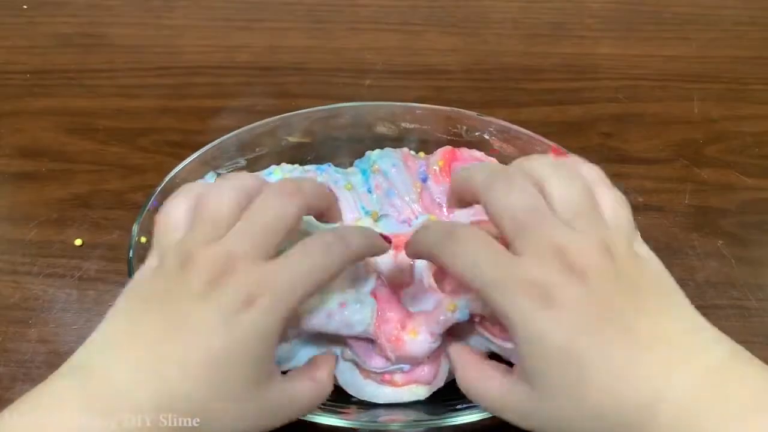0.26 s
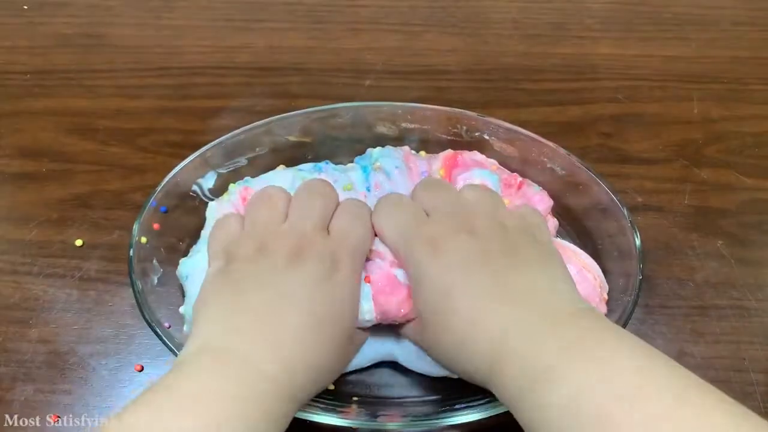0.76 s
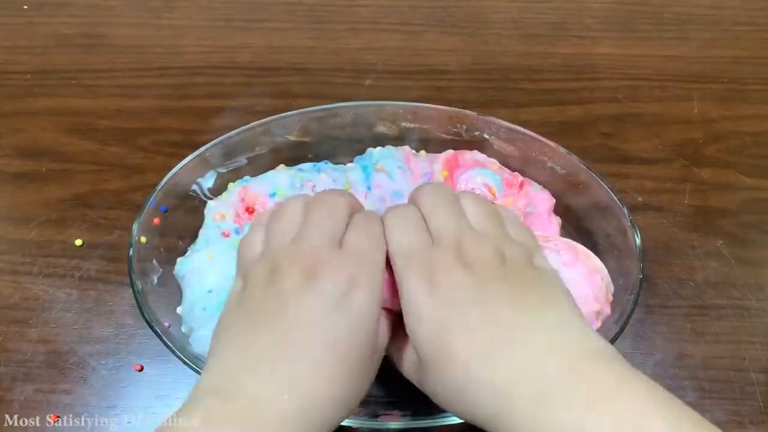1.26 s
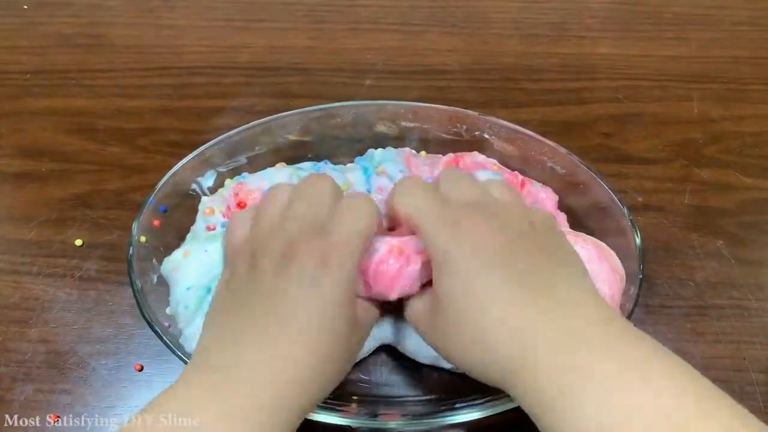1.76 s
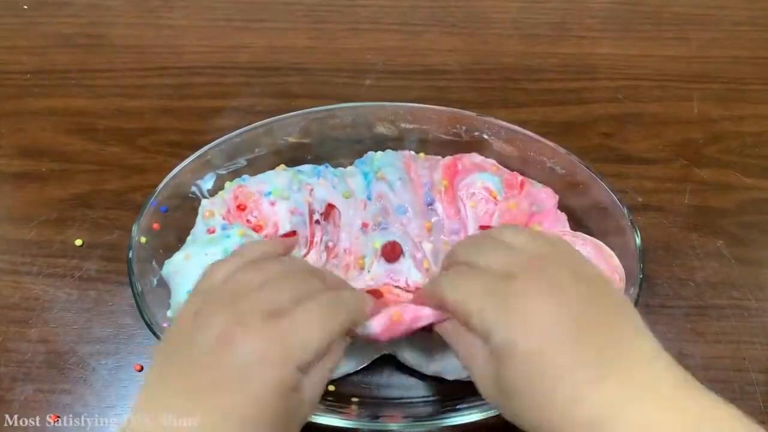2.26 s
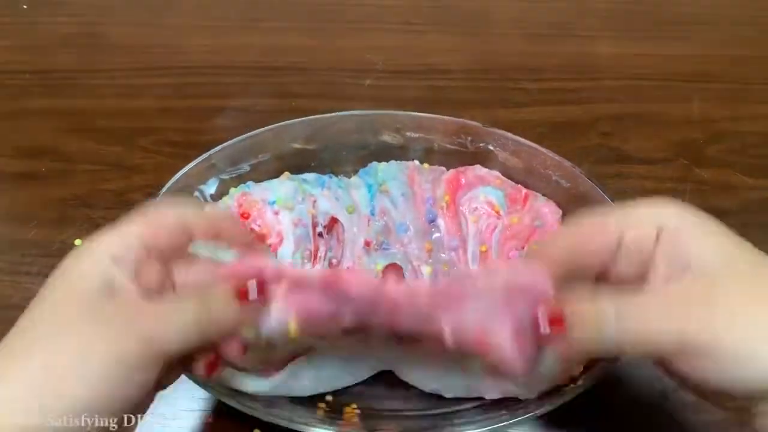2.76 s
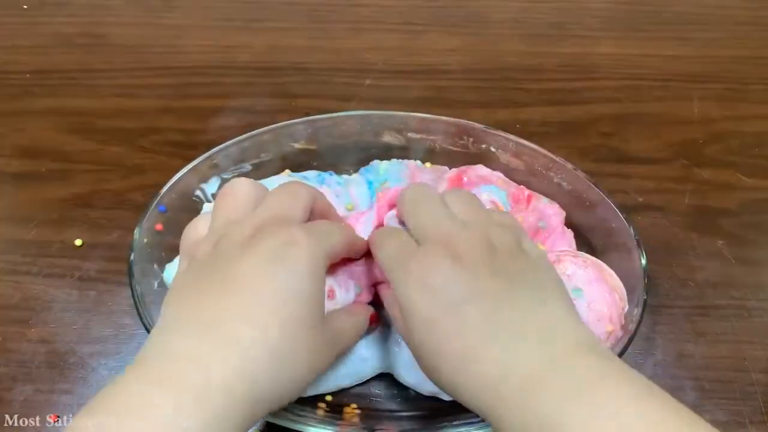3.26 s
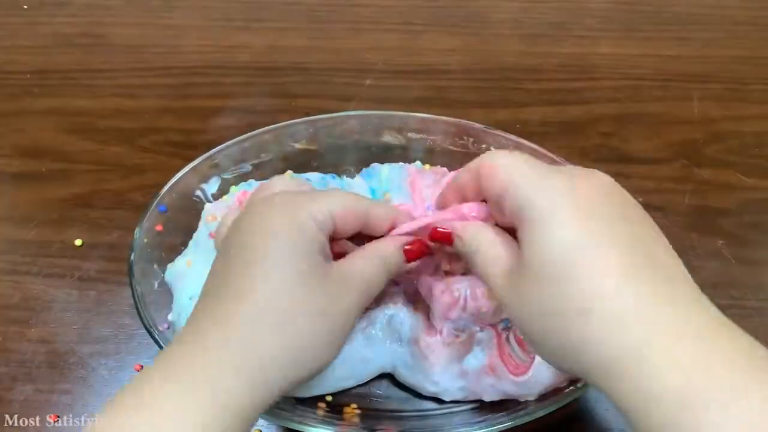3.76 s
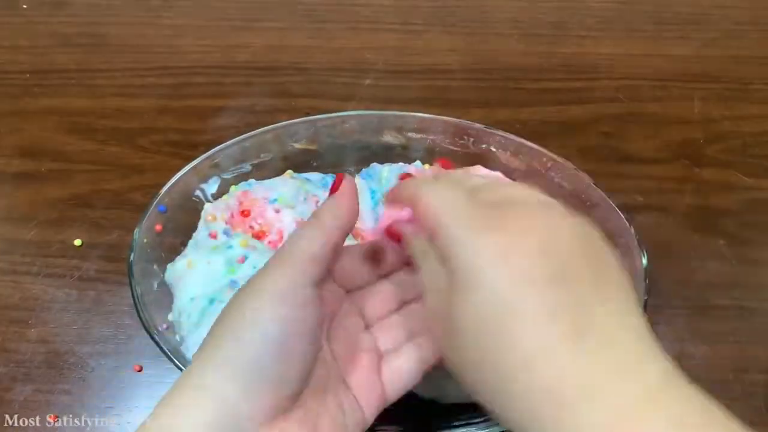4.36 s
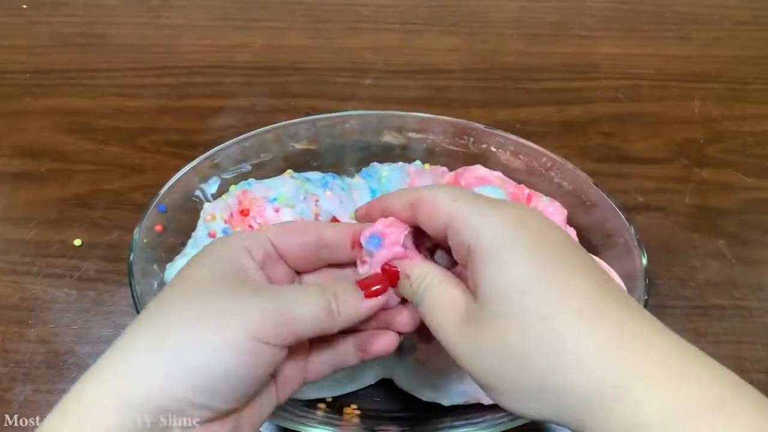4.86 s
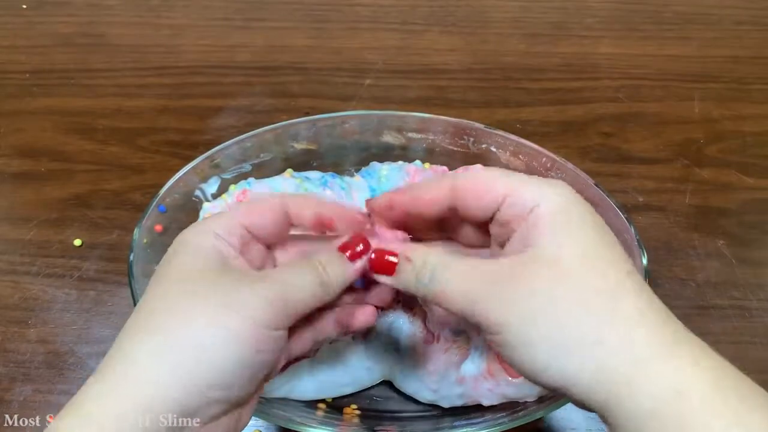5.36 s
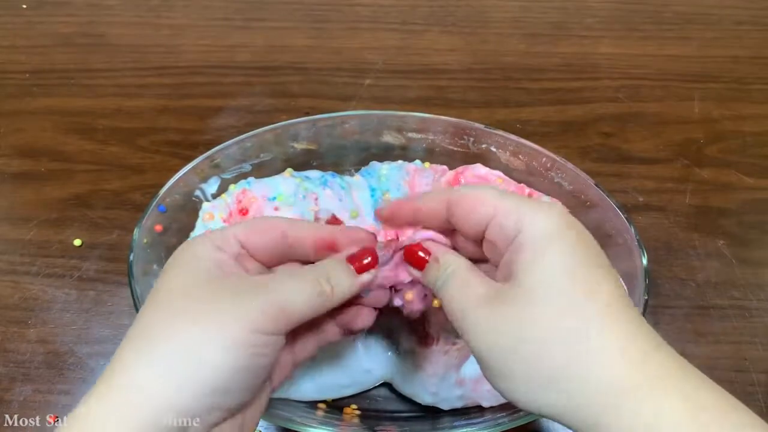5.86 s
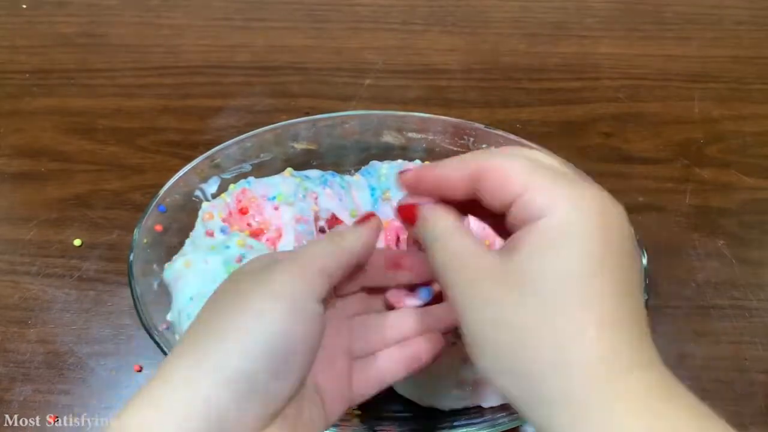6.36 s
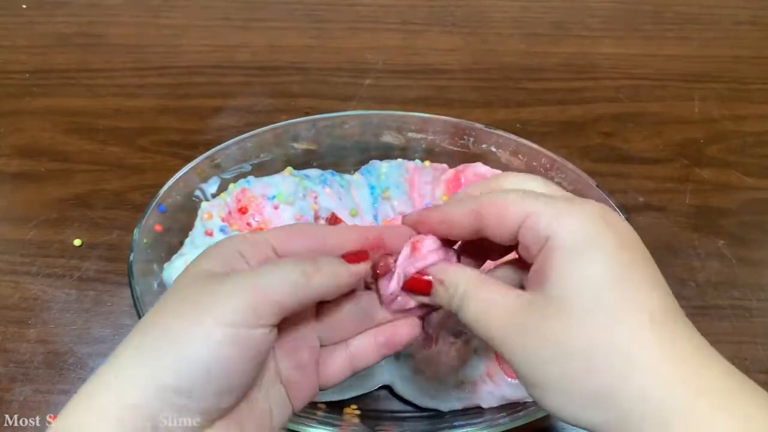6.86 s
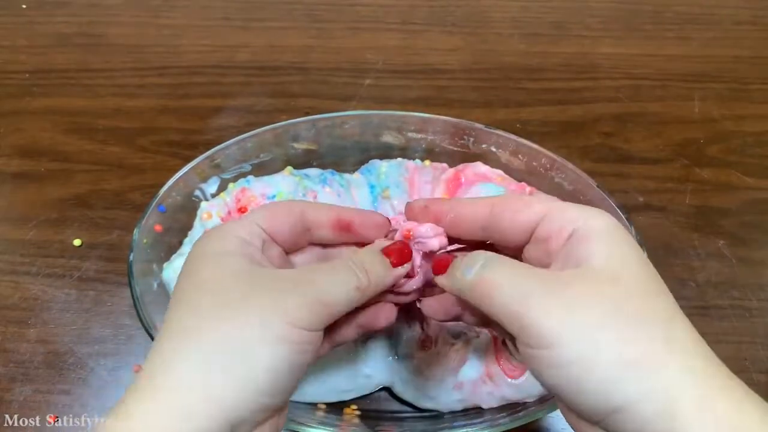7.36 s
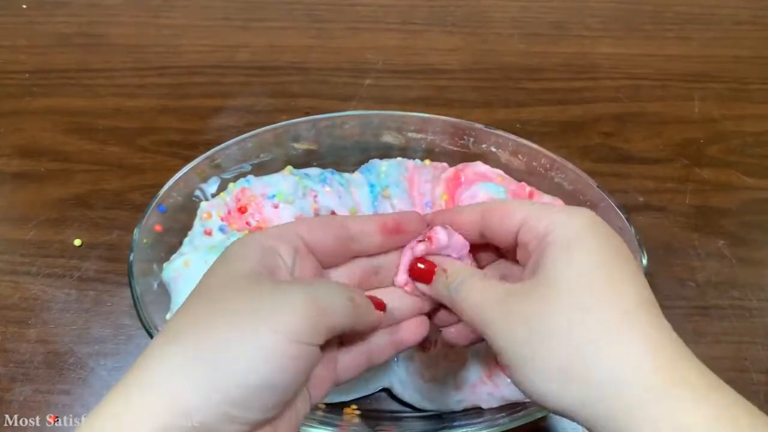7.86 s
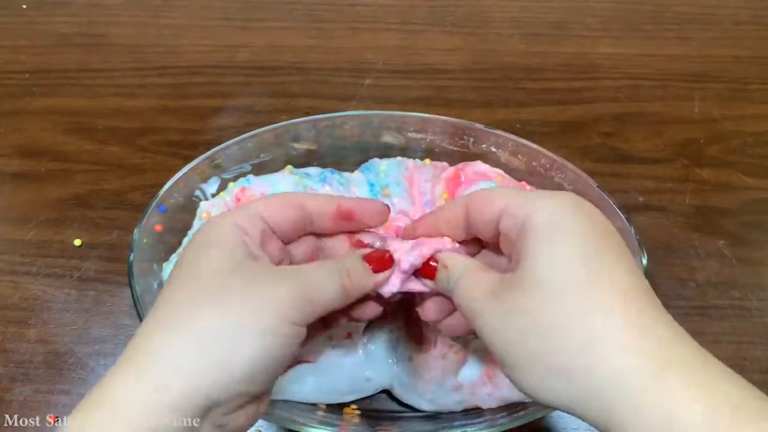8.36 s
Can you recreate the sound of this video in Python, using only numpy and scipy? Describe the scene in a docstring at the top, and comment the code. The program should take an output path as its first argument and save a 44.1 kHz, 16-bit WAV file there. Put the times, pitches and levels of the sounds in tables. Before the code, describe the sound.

Hands squeeze wet beaded slime in a glass bowl, three loud squelches burst into diving plops, then quieter squishes and scattered sticky snaps follow.

```python
"""Two hands work wet slime in a glass bowl on a table, close to a stereo microphone in a small room.
The bowl still rings from a touch at the start; in the first seconds come three hard squeezes,
each a swelling fizz of tiny bubbles, then a run of plops, big pockets whose notes dive in pitch.
Lighter squeezes follow to the end, noise bursts over ringing grains that shed a few tiny snaps.
Sticky crackle, soft handling noise, room air and a low hum are shaped from random noise."""
import sys
import numpy as np
from scipy import signal
from scipy.fft import rfft, irfft, next_fast_len
from scipy.io import wavfile

SR = 44100
rng = np.random.default_rng(int(sys.argv[2]) if len(sys.argv) > 2 else 0)


def wav_record(signal):
    """Record a signal, one row per channel, as 16-bit PCM in the file named by sys.argv[1]."""
    frames = np.transpose(np.atleast_2d(signal))
    bounded = np.clip(frames, -1, 1)
    # unit amplitude maps onto the largest positive 16-bit level
    quanta = np.round(bounded * 32767).astype(np.int16)
    wavfile.write(sys.argv[1], SR, quanta)


N = 379701
TIME = np.arange(N) / SR   # s

# Squishes, air forced through the slime. Each row: fullest moment in seconds, fade in seconds,
# fizz level in dB, gurgle level in dB, gurgle pitch in Hz; the levels are ahead of the trims.
SQUEEZES = [(0.189, 0.39, -59.5, -62.5, 2400), (.515, 0.12, -45, -48, 2470),
            (0.569, 0.02, -42.5, -33, 2660), (0.969, 0.066, -48, -58, 4980),
            (1.065, 0.064, -52, -52.5, 2890), (1.17, 0.046, -47, -59, 3460),
            (1.388, 0.062, -32, -32.5, 2870), (1.744, 0.021, -61, -59.5, 3000),
            (1.871, 0.033, -55, -50.5, 4760), (2.052, 0.098, -55.5, -60, 3550),
            (2.13, 0.084, -37, -37, 2810), (2.709, .05, -56.5, -60, 2450),
            (2.912, 0.018, -56.5, -64.5, 4440), (3.123, 0.032, -54, -59.5, 2880),
            (3.229, 0.043, -52, -56, 4200), (3.463, 0.022, -56.5, -67.5, 1930),
            (3.614, 0.022, -61, -70, 3960), (3.822, 0.051, -49, -50.5, 3200),
            (4.155, 0.026, -63, -61.5, 2730), (4.584, 0.023, -58.5, -57.5, 5360),
            (4.775, 0.03, -51, -54, 4000), (4.835, 0.023, -49, -46.5, 5280),
            (4.942, 0.022, -49.5, -57.5, 5300), (5.078, 0.024, -65, -60, 3830),
            (5.524, 0.043, -48.5, -48.5, 3474), (5.735, 0.02, -51, -54, 3400),
            (5.985, .05, -52.5, -67, 4400), (6.07, 0.019, -52.5, -57, 3360),
            (6.131, 0.044, -59.5, -62, 4520), (6.237, 0.013, -53.5, -56.5, 4700),
            (6.606, 0.012, -47, -52, 4670), (6.781, 0.05, -56, -64.5, 3320),
            (6.994, 0.011, -53.5, -61, 4200), (7.179, .016, -46, -60, 2060),
            (7.568, .012, -49.5, -55.5, 3000), (7.993, 0.02, -50, -56, 3590),
            (8.106, 0.014, -61, -63, 2980), (8.56, 0.026, -45, -45, 3170)]
# Stretches of kneading with a steady crackle. Each row: start in seconds, end in seconds,
# film level in dB, cavity level in dB; the levels are ahead of the trims.
KNEADING = [(0.219, 0.316, -70, -64), (0.721, .88, -79.5, -68), (0.981, 1.288, -53, -53.5),
            (1.559, 1.701, -74.5, -68.5), (1.761, 2.018, -60, -58.5), (5.95, 6.12, -57, -85),
            (8.279, 8.356, -73, -68.5)]

# a move of the hands changes by EDGE_DB over its swell time and again over its fade time
EDGE_DB, SQUEEZE_SWELL_S = -12.5, 0.026


def from_db(db):
    """Decibels to gain."""
    return 10 ** (np.asarray(db) / 20)


def rms_one(x):
    """Scale to unit rms."""
    return x / np.sqrt(np.mean(x ** 2) + 1e-20)


def at_hz(points, hz):
    """Read a table on a log-frequency axis."""
    points = np.array(points)
    return np.interp(np.log(np.maximum(hz, 1)), np.log(points[:, 0]), points[:, 1])


def add(out, s, sound):
    """Mix a sound in at a time in seconds."""
    i = max(round(s * SR), 0)
    out[..., i:i + sound.shape[-1]] += sound[..., :max(N - i, 0)]


def coloured(x, spectrum):
    """Give a noise a smooth spectrum; rms 1."""
    size = next_fast_len(N)
    gain = from_db(at_hz(spectrum, np.fft.rfftfreq(size, 1 / SR)))
    return rms_one(irfft(rfft(x, size) * gain, size)[..., :N])


def diffuse(size):
    """Stereo white noise from all around: mid and side noise mixed by how alike the channels are."""
    # Likeness of left and right. Each row: frequency in Hz, likeness from 0 to 1.
    likeness = [(100, 0.93), (300, 0.93), (600, .65), (1200, 0.2), (2500, 0), (4000, 0.5), (7500, 0.78),
                (9500, 0.7), (15000, 1)]
    mid, side = rfft(rng.standard_normal((2, size)))
    alike = np.clip(at_hz(likeness, np.fft.rfftfreq(size, 1 / SR)), 0, 1)
    shared = np.sqrt((1 + alike) / 2) * mid
    opposed = np.sqrt((1 - alike) / 2) * side * [[1], [-1]]
    return irfft(shared + opposed, size)


def resonance(x, hz, width_hz):
    """Two-pole resonance with gain 1 on top."""
    r = np.exp(-np.pi * width_hz / SR)
    zeros = np.array([1, 0, -1]) * (1 - r * r) / 2
    poles = [1, -2 * r * np.cos(2 * np.pi * hz / SR), r * r]
    return signal.lfilter(zeros, poles, x + 1e-18)


def drift(rate):
    """Random wander around 0: normal draws at so many points per second, joined by straight lines."""
    return np.interp(TIME * rate, np.arange(4096), rng.standard_normal(4096))


def clicks(size, per_s, spread_db):
    """Random clicks of uneven strength and either sign."""
    born = rng.random(size) < per_s / SR
    strength = from_db(spread_db * np.minimum(rng.exponential(1, size), 3.5))
    return born * strength * rng.choice([-1, 1], size)


def grains(size, centre_hz, span, per_s, spread_db, q, count):
    """Tiny bubbles ring briefly at pitches spread around the centre, the outer ones weaker; rms 1."""
    hits = clicks(size, per_s, spread_db)
    dealt = rng.integers(0, count, size)   # which pitch each hit excites
    places = np.linspace(-1, 1, count) + rng.normal(0, 1 / count, count)
    pitches = np.minimum(centre_hz * span ** places, SR * .45)
    total = np.zeros(size)
    for k, hz in enumerate(pitches):
        ringing = resonance(hits * (dealt == k), hz, hz / q)
        total += ringing * np.exp(-places[k] ** 2) / np.sqrt(hz)
    return rms_one(total)


def surge(t, swell_s, fade_s):
    """Level in dB of one move of the hands, fullest at t = 0."""
    return EDGE_DB * np.maximum(-t / max(swell_s, .005), t / max(fade_s, .005))


def moves(rows, swell_s):
    """Gain of a series of moves; the strongest at each moment leads."""
    levels = [db + surge(TIME - s, swell_s, fade_s) for s, fade_s, db in rows]
    return from_db(np.max(levels, axis=0))


def background(air_db=-1):
    """Faint room air, noise from all around, and a low hum wavering as noise in a narrow resonance."""
    # Colour of the room air. Each row: frequency in Hz, relative level in dB.
    air_colour = [(12, -32), (20, -0.5), (107, -1), (163, -12.5), (434, -17.5), (1260, -31), (1960, -32.5),
                  (2910, -32.5), (3630, -28), (7520, -35.5), (8890, -26.5), (10800, -35), (12100, -42),
                  (14300, -29), (16000, -43)]
    hum = rms_one(resonance(rng.standard_normal(N + SR), hz=104.6, width_hz=3)[SR:])   # already settled
    air = coloured(diffuse(next_fast_len(N)), air_colour)
    return from_db(-62 + air_db) * air + from_db(-63.5) * hum


def bowl():
    """The glass bowl still rings from a touch: a few sine modes fade out from the start."""
    # Glass modes. Each row: pitch in Hz, starting level in dB, 60 dB decay time in seconds.
    glass_modes = [(1480, -59, .4), (2250, -68, .25), (3170, -57.5, 0.21), (4200, -67, .3)]
    return sum(from_db(db - 60 * TIME / t60) * np.sin(2 * np.pi * hz * TIME) for hz, db, t60 in glass_modes)


def handling(palms_db=-1.5, arms_db=-1, lumps_db=3):
    """The soft mass shifts in lumps under the palms, and the arms lean on the table with a dull rumble."""
    # Palms pressing. Each row: fullest moment in seconds, fade in seconds, level in dB ahead of the trim.
    presses = [(.05, 0.2, -51), (.49, 0.47, -43.5), (1.03, 0.15, -43), (1.37, .05, -44.5),
               (1.73, 0.043, -48.5), (2.12, 0.077, -43), (2.65, .15, -62), (3.11, 0.16, -53),
               (3.73, .06, -60), (3.92, 0.042, -48), (4.36, 0.049, -53.5), (4.6, 0.077, -62),
               (4.82, 0.34, -60), (5.52, .03, -57), (5.98, 0.21, -60), (6.52, 0.43, -64), (7.18, .03, -53),
               (7.65, 0.18, -61)]
    # Arms leaning. Each row: fullest moment in seconds, fade in seconds, level in dB ahead of the trim.
    leans = [(.07, 0.12, -47), (.61, .1, -46.5), (1.43, .08, -48), (2.18, 0.066, -40.5), (7.33, 0.2, -47.5),
             (7.65, 0.19, -39), (8.42, 0.27, -55.5)]
    # Colours of the two noises. Each row: frequency in Hz, relative level in dB.
    palm_colour = [(30, -9.5), (60, -0.5), (100, -3.5), (200, 0), (400, -1.5), (600, -9.5), (1200, -17.5),
                   (3000, -28.5), (9000, -69.5)]
    arm_colour = [(22, 2.5), (45, 5), (75, 9), (130, 2.5), (220, -7), (400, -12.5), (600, -35.5),
                  (1500, -71.5)]
    palms = from_db(palms_db + lumps_db * drift(45)) * moves(presses, swell_s=0.031)
    arms = from_db(arms_db) * moves(leans, swell_s=0.041)
    shifting = palms * coloured(diffuse(next_fast_len(N)), palm_colour)
    rumble = arms * coloured(diffuse(next_fast_len(N)), arm_colour)
    return shifting + rumble


def crackle(film_db=-1, cavity_db=-1, edge_s=0.04):
    """While the fists knead, sticky surfaces part in a mist of tiny snaps and hollow ticks."""
    out = np.zeros(N)
    for start, end, high_db, low_db in KNEADING:
        t = np.arange(start - 2 * edge_s, end + 2 * edge_s, 1 / SR)
        outside = t - np.clip(t, start, end)   # 0 while the grip is full
        grip = from_db(surge(outside, edge_s, edge_s))
        high = grains(len(t), 11500, span=3.2, per_s=170, spread_db=2, q=1.1, count=6)
        low = grains(len(t), 3170, span=3.8, per_s=220, spread_db=1.5, q=5.4, count=14)
        add(out, t[0], grip * (from_db(film_db + high_db) * high + from_db(cavity_db + low_db) * low))
    return out


def scattered(count, start, end, film_db, cavity_db, hz):
    """Snaps at random moments of a stretch, scattered around a typical level and pitch."""
    scatter_db, film_octaves, cavity_octaves = 3.5, 0.15, 0.51
    moments = rng.random(count)
    chances = np.clip(rng.standard_normal((count, 4)), -2, 2)
    return [(start + when * (end - start),
             film_db + scatter_db * film, 11300 * 2 ** (film_octaves * bright),
             cavity_db + scatter_db * cavity, hz * 2 ** (cavity_octaves * small))
            for when, (film, bright, cavity, small) in zip(moments, chances)]


def faint_snaps():
    """Bubbles give way now and then by themselves, a few with every squeeze and more under kneading."""
    stray_hz = 3700   # typical cavity pitch
    rows = scattered(count=50, start=0, end=N / SR, film_db=-59, cavity_db=-62.5, hz=stray_hz)
    for fullest, fade, fizz_db, gurgle_db, hz in SQUEEZES:
        rows += scattered(count=3, start=fullest - SQUEEZE_SWELL_S, end=fullest + fade,
                          film_db=fizz_db + 3, cavity_db=gurgle_db + 2, hz=hz)
    for start, end, high_db, low_db in KNEADING:
        rows += scattered(count=10, start=start, end=end,
                          film_db=high_db + 8, cavity_db=low_db + 8, hz=stray_hz)
    return rows


def per_ms(x):
    """Scale each channel so that its whole energy, packed into 1 ms, has rms 1."""
    return x / np.sqrt(np.sum(x ** 2, axis=-1, keepdims=True) * 1000 / SR)


def snaps(film_s=.00005, spray_s=0.001, spray_db=-16, cavity_cycles=1.3, opening_cycles=0.25,
          film_db=0, cavity_db=-1, pan_db=-0.53, wet_db=-15, wet_s=.0028):
    """A film breaks with a very short snap and some spray; the cavity behind it rings a few ragged cycles."""
    # The louder bubbles. Each row: start in seconds, film level in dB, film pitch in Hz,
    # cavity level in dB, cavity pitch in Hz; the levels are over 1 ms, ahead of trim, pan and low cut.
    loud_snaps = [(0.1419, -44.5, 10500, -26.5, 5040), (.169, -21, 9900, -27, 6250),
                  (0.2106, -43, 13000, -37, 1620), (.3618, -40, 10000, -50, 4800),
                  (0.3776, -31.5, 9350, -48, 6400), (.4418, -48, 10500, -36.5, 2300),
                  (0.53, -29.5, 11600, -35.5, 2880), (0.5757, -25, 12200, -44, 4200),
                  (0.5931, -27, 12900, -21.5, 1480), (0.829, -63, 11800, -35.5, 2560),
                  (.9219, -30.5, 13400, -43, 4000), (.972, -38, 12700, -49, 5200),
                  (1.0648, -32.5, 10600, -33, 6000), (1.1185, -44, 10500, -32, 4540),
                  (1.149, -33, 11900, -44, 4670), (1.17, -30, 12500, -36, 4730),
                  (1.2096, -39, 10000, -35, 5200), (1.2232, -25, 10500, -32, 3700),
                  (1.2565, -27.5, 10700, -29.5, 5160), (1.3219, -23, 10500, -29, 3550),
                  (1.397, -38, 9800, -41, 3230), (1.7351, -37, 13500, -43, 2460),
                  (1.7858, -35.5, 11870, -49, 5200), (1.8502, -50, 9950, -37.5, 3800),
                  (1.9004, -39.5, 12400, -42, 4500), (2.0525, -41, 13500, -58, 2760),
                  (2.809, -67, 9130, -45.5, 3570), (3.462, -61, 9400, -52, 1582),
                  (3.5255, -40, 9200, -61.5, 5575), (3.5936, -43, 12250, -70, 6030),
                  (3.7213, -60.5, 10050, -35.5, 1700), (3.7327, -68, 10100, -37, 1920),
                  (3.866, -67, 11300, -44, 2610), (4.181, -49.5, 9480, -53, 3730),
                  (4.335, -66.5, 9480, -52, 3090), (4.5597, -41.5, 13440, -68, 5050),
                  (4.801, -28.5, 13500, -38, 5970), (4.837, -48.5, 11100, -34.5, 5400),
                  (5.184, -40.5, 11800, -48, 3645), (5.355, -40, 13350, -66, 4700),
                  (5.3651, -21, 14440, -49.5, 5920), (5.438, -43, 12600, -57, 3690),
                  (5.504, -39, 12500, -43.5, 2820), (5.508, -23.5, 12240, -27.5, 3450),
                  (5.7632, -29, 11980, -46.5, 5200), (5.8742, -42.5, 11500, -71, 3900),
                  (5.935, -23.5, 12000, -42, 2970), (5.9529, -34, 11300, -39.5, 3800),
                  (5.969, -23, 13000, -36, 3630), (6.037, -54, 9600, -35.5, 3760),
                  (6.127, -39, 10680, -35, 4530), (6.3924, -25, 12960, -38, 3280),
                  (6.599, -25, 11600, -53.5, 5570), (6.777, -36.5, 13440, -52.5, 4010),
                  (7.182, -29.5, 12340, -42, 1820), (7.1907, -41, 12100, -48.5, 1810),
                  (7.3669, -36.5, 12800, -49, 4940), (7.422, -34.5, 12750, -45, 5640),
                  (7.57, -33.5, 11900, -58, 4450), (7.903, -46, 12450, -55.5, 2320),
                  (7.9615, -23, 12560, -59, 6040), (8.1114, -45, 9740, -48.5, 3460),
                  (8.2692, -28.5, 12050, -46.5, 4230)]
    out, t = np.zeros((2, N)), np.arange(SR // 100) / SR
    for s, snap_db, snap_hz, hollow_db, hollow_hz in [*loud_snaps, *faint_snaps()]:
        spray = rms_one(resonance(rng.standard_normal((2, len(t))), snap_hz, 7400)) * np.exp(-t / spray_s)
        pulse = t / film_s * np.exp(1 - t / film_s)
        film = pulse * np.sin(2 * np.pi * snap_hz * t) + from_db(spray_db) * spray

        paths = rng.normal(0, 1.0, (2, 1))   # radians; the hands shade each port differently
        cavity = np.exp(-t * hollow_hz / cavity_cycles) * np.sin(2 * np.pi * hollow_hz * t + paths)
        peeling = resonance(rng.standard_normal((2, len(t))), hollow_hz, hollow_hz * 0.36)
        wet = rms_one(peeling) * np.exp(-t / wet_s)   # its walls peel apart
        opening = 1 - np.exp(-t * hollow_hz / opening_cycles)   # it takes part of a cycle to open
        cavity = (cavity + from_db(wet_db) * wet) * opening

        place = from_db(pan_db * rng.standard_normal() * np.array([[1], [-1]]))
        film = from_db(snap_db + film_db) * per_ms(film)
        cavity = from_db(hollow_db + cavity_db) * per_ms(cavity)
        add(out, s, place * (film + cavity))
    # bubbles this small radiate no bass
    return signal.sosfilt(signal.butter(2, 500, "high", fs=SR, output="sos"), out + 1e-18)


def squishes(fizz_db=-2.0, gurgle_db=-2.0, flutter_db=2):
    """Small bubbles break under pressure: bright fizz over hollow gurgle, swelling and dying together."""
    # Colour of the fizz. Each row: frequency in Hz, relative level in dB.
    fizz_colour = [(500, -26.5), (2000, -15.5), (4000, -8), (7000, -1), (9500, 3.5), (12000, -5),
                   (14500, 5.5), (17000, -13.5)]
    fizz, gurgle = np.zeros(N), np.zeros(N)
    for fullest, fade, high_db, low_db, hz in SQUEEZES:
        t = np.arange(-2 * SQUEEZE_SWELL_S, 2 * fade, 1 / SR)
        pressure = from_db(surge(t, SQUEEZE_SWELL_S, fade))
        bubbles = grains(len(t), hz, span=2.4, per_s=1800, spread_db=1.5, q=14, count=14)
        add(fizz, fullest + t[0], pressure * from_db(high_db + fizz_db))
        add(gurgle, fullest + t[0], pressure * from_db(low_db + gurgle_db) * bubbles)
    # so far the fizz is only a gain; it opens on a steady run of clicks
    fizz = fizz * coloured(clicks(N, per_s=3300, spread_db=2.0), fizz_colour)
    return (fizz + gurgle) * from_db(flutter_db * drift(130))


def plops(start_ratio=5.76, fall_cycles=0.28, swell_cycles=0.84, ring_cycles=0.37,
          tear_db=-16, tear_hz=1600, puff_db=-15, puff_hz=95):
    """A pocket tears open: its note dives within two or three cycles, with a little rasp and a low puff."""
    # Air pockets bursting. Each row: start in seconds, level of the note in dB, pitch it falls to in Hz.
    pockets = [(0.047, -45, 380), (.169, -37.5, 423.5), (.5774, -10.5, 368), (0.5843, -13, 394),
               (0.5882, -13, 303), (1.4036, -14, 340), (1.4333, -17.5, 335), (1.4477, -22.5, 410),
               (2.1556, -12, 376), (2.1750, -16.5, 301), (2.1980, -21, 320), (2.2204, -22, 326),
               (2.2281, -30, 333), (2.2570, -31, 366), (2.575, -49, 385), (3.7213, -46, 320),
               (3.8813, -36.5, 358), (4.324, -45.5, 420)]
    out, t = np.zeros(N), np.arange(SR // 25) / SR
    for s, db, hz in pockets:
        age = t * hz   # in cycles of the final pitch
        turns = age + (start_ratio - 1) * fall_cycles * (1 - np.exp(-age / fall_cycles))
        rise = age / swell_cycles
        swell = (1 - np.exp(-rise * 2.6)) / (1 + np.exp(np.minimum((rise - 1.9) / ring_cycles, 20)))
        swell = swell / swell.max()
        rasp = rms_one(resonance(rng.standard_normal(len(t)), tear_hz, 870))
        puff = np.sin(2 * np.pi * puff_hz * t) * np.exp(-t * puff_hz * 1.9)
        note = swell * (np.sin(2 * np.pi * turns) + from_db(tear_db) * rasp)
        add(out, s, from_db(db) * (note + from_db(puff_db) * puff))
    return out


def room(x, wet_db=-1, modes_db=-54, gap_s=0.00066, build_s=0.001):
    """A diffuse tail that dies at its own pace in each band, and a few low resonances that ring on."""
    # Colour of the tail. Each row: frequency in Hz, level in dB ahead of the trim.
    tail_colour = [(40, 7), (100, 3.5), (250, 4), (500, -6.5), (700, -2), (1000, 3), (2000, -3.5),
                   (4000, -1.5), (8000, -7.5), (15000, -8)]
    # Decay of the tail. Each row: frequency in Hz, 60 dB decay time in seconds.
    tail_decay = [(60, 0.99), (250, 0.47), (700, 0.39), (2000, 0.76), (5000, 0.17), (10000, 0.69),
                  (16000, 0.087)]
    # Low resonances of bowl, table and room. Each row: pitch in Hz, level in dB ahead of the trim,
    # 60 dB decay time in seconds.
    low_modes = [(106, 4, .6), (148, -10.5, 0.25), (210.95, 14, .42), (275, -6.5, 0.24),
                 (318.5, -6.5, 0.55), (377.7, -2, 0.5), (593, -8.5, 0.22), (816, -13.5, 0.23),
                 (857, -6.5, 0.49), (948, -12, .5), (1144, -4.5, .5), (1234, -12, 0.55), (1370, -10, .45),
                 (1730, -14, .55)]
    size = SR
    t, hz = np.arange(size) / SR, np.fft.rfftfreq(size, 1 / SR)
    noise = rfft(diffuse(size)) * from_db(at_hz(tail_colour, hz) + wet_db)
    centres, tail = np.geomspace(60, 16000, 9), 0
    for centre, share in zip(centres, np.eye(len(centres))):
        build = 1 - np.exp(-np.maximum(t - gap_s, 0) / build_s)
        fade = from_db(-60 * t / at_hz(tail_decay, centre)) * build
        band = irfft(noise * at_hz(np.c_[centres, share], hz), size)   # overlapping bands
        tail = tail + band * fade / np.sqrt(np.sum(fade ** 2))
    for mode_hz, db, t60 in low_modes:
        tail = tail + from_db(db + modes_db - 60 * t / t60) * np.cos(2 * np.pi * mode_hz * t)
    return signal.fftconvolve(x[None], tail, axes=1)[:, :N]


def scene():
    """The slime close by, its room, and the quiet behind it."""
    behind = bowl() + handling() + background()
    slime = plops() + snaps() + squishes() + crackle()
    sides = from_db(0.8 * np.array([[1], [-1]]))   # the room answers a little louder on the left
    return slime + sides * room(slime.mean(axis=0)) + behind


def record(dry):
    """The left microphone port is shifted in phase against the right in the treble; the top is cut."""
    # Phase of the left port against the right. Each row: frequency in Hz, phase in radians.
    port_phase = [(0, 0), (1700, 0), (2700, 1.4), (4000, 1.75), (7000, 1.75), (8000, 2.1), (17000, -9.7)]
    size = next_fast_len(N + SR // 10)
    phase = np.interp(np.fft.rfftfreq(size, 1 / SR), *np.transpose(port_phase))
    left = irfft(rfft(dry[0], size) * np.exp(1j * phase), size)[:N]
    top_cut = signal.ellip(10, .3, 80, 16400, fs=SR, output="sos")
    return signal.sosfilt(top_cut, [left, dry[1]])


dry = scene()
out = record(dry)
wav_record(out)
```